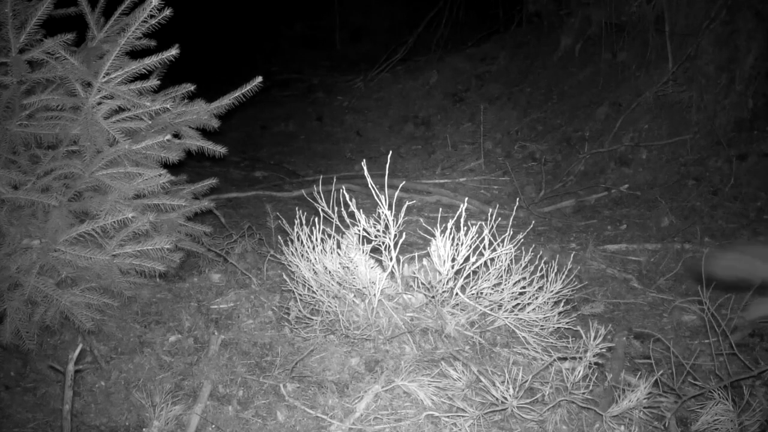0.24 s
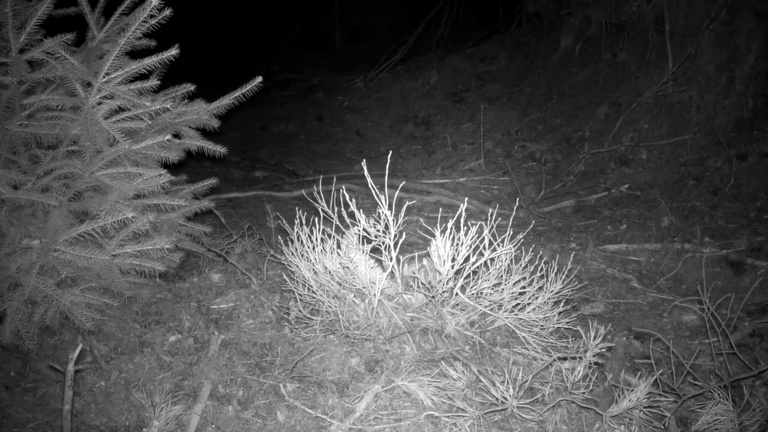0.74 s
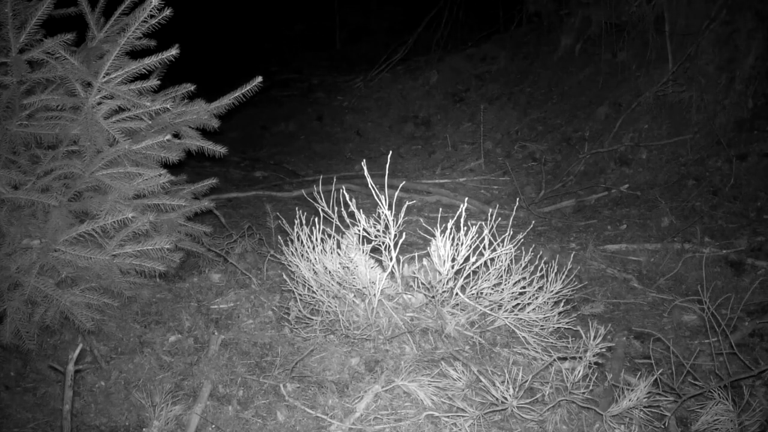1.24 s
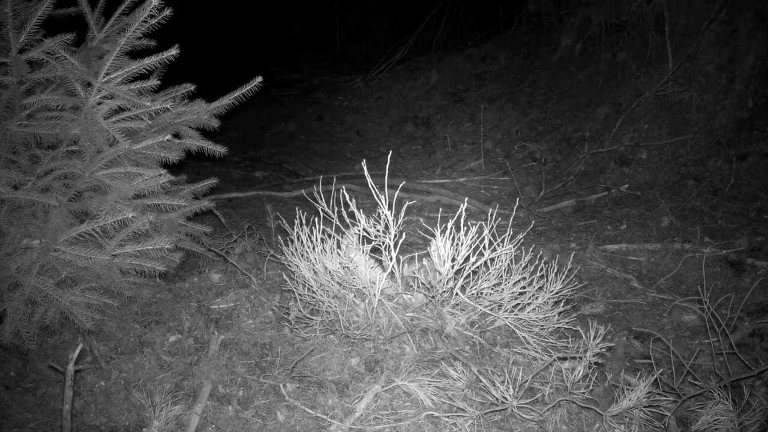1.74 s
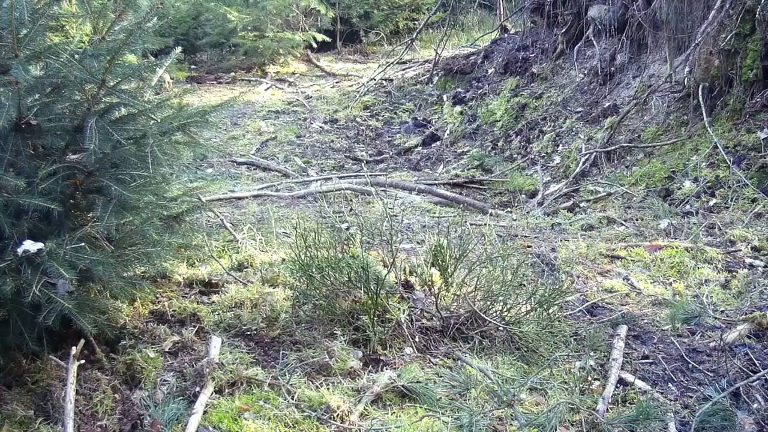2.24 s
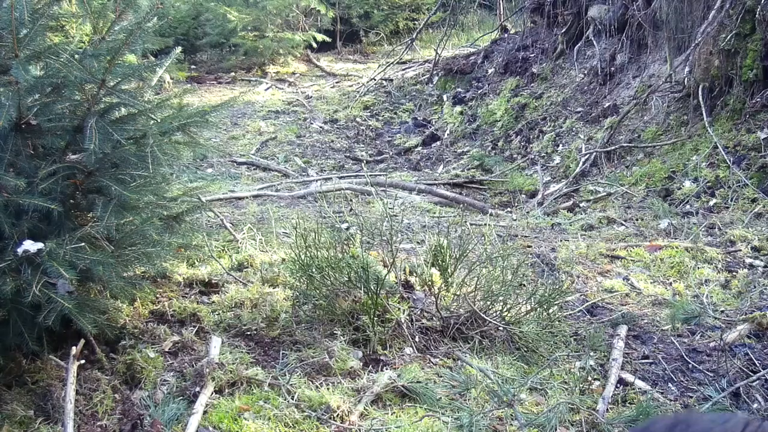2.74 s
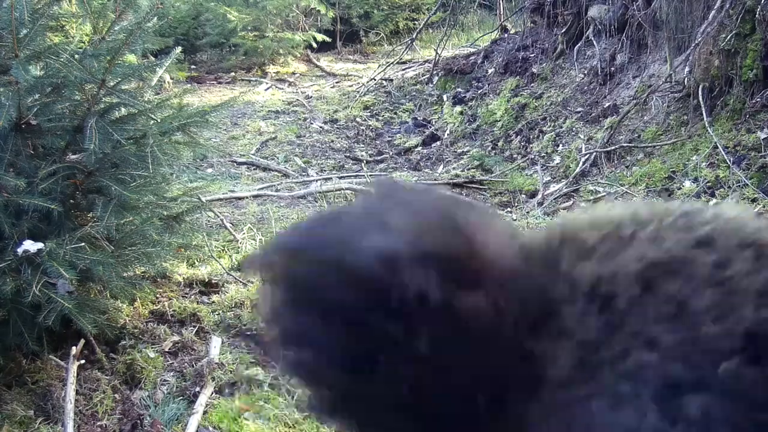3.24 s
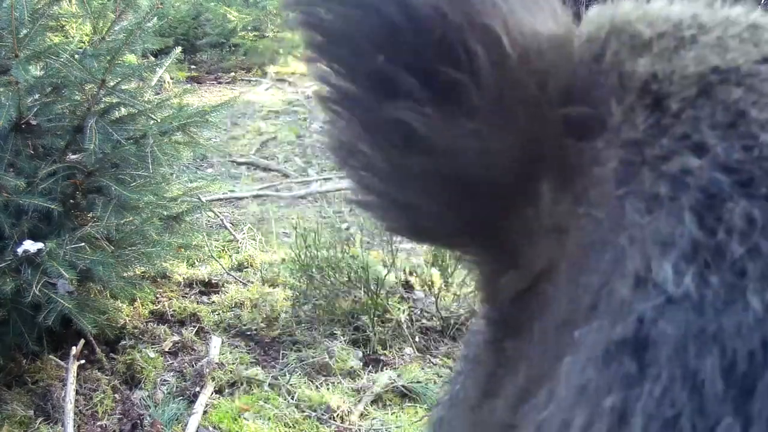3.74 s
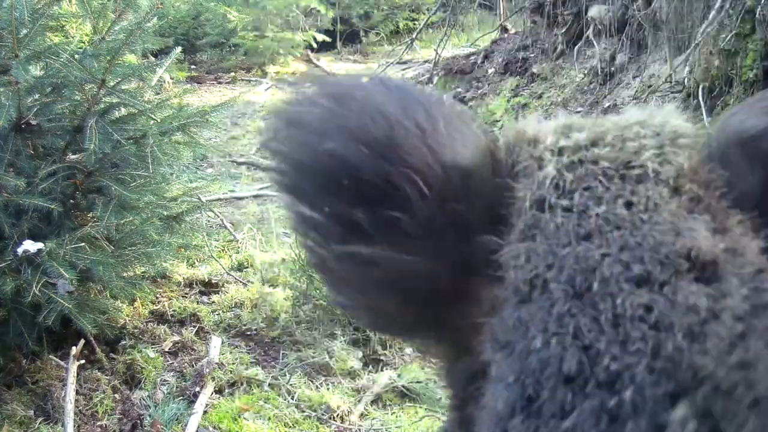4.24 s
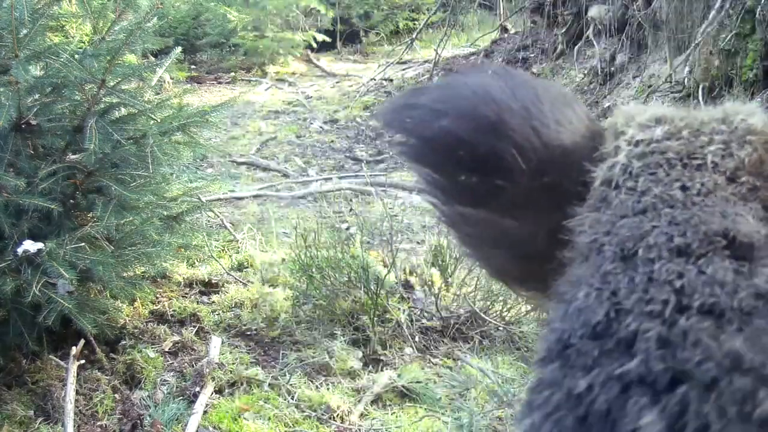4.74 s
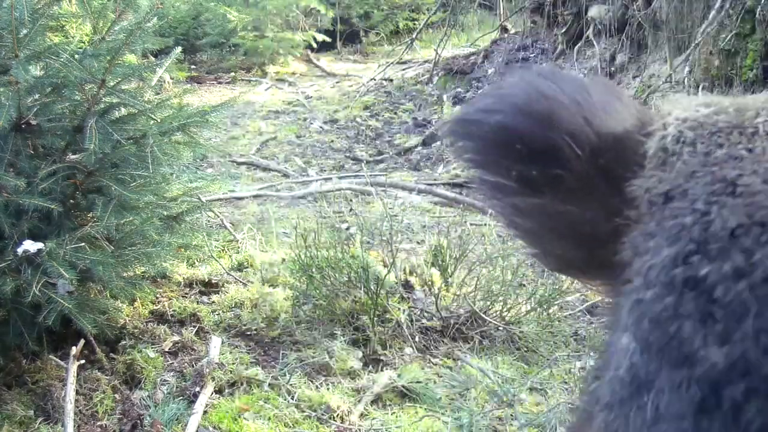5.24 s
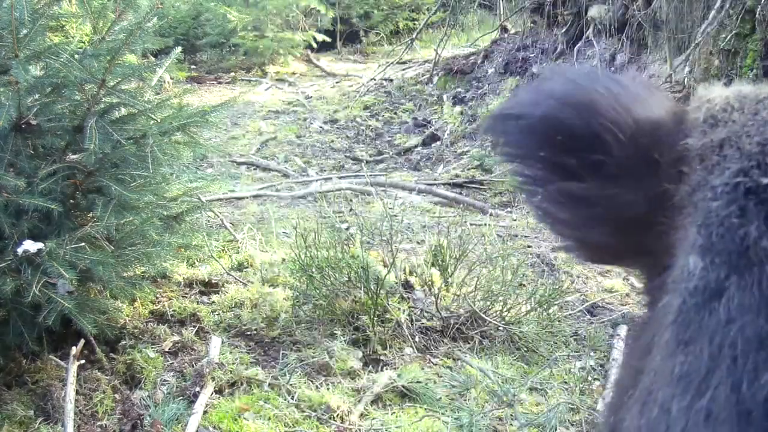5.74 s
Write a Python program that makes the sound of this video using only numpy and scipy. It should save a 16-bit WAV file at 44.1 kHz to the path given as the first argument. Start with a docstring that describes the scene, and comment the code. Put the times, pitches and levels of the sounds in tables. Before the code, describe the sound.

Shrill, quivering squeal at night fades to hushed air; abruptly, daytime rustling, one hard overloaded knock, and repeated coarse fur scraping against plastic.

```python
"""A thin, warbling animal squeal splits into two tones before a trail camera in a forest at night, then fades.
By day a wild boar rustles up, bumps the camera and rubs against it stroke after stroke.
The squeal is two oscillators in one throat, with overtones and breath noise. The rubbing is a dense rain
of bristle flicks, and the knocks are noise bursts with short modes of the plastic housing.
Chirps, a whistle, low hums, noisy clicks and puffs, snaps, crackling litter and forest air surround them."""
import sys
import numpy as np
from scipy import signal
from scipy.fft import rfft, irfft, next_fast_len
from scipy.io import wavfile
from scipy.ndimage import uniform_filter1d

SR = 44100
rng = np.random.default_rng(int(sys.argv[2]) if len(sys.argv) > 2 else 0)


def int16_out(signal):
    """Quantize to a 16-bit WAV file."""
    q = np.round(np.clip(np.atleast_2d(signal).T, -1, 1) * 32767)
    wavfile.write(sys.argv[1], SR, q.astype(np.int16))


N = 264159
T = np.arange(N) / SR  # time [s]

# The three cries of the squeal, one list each:
# (time [s], pitch [Hz], level of the first tone [dB], warble depth [share of the pitch])
CRIES = [
    [(0, 1192, -41, 0.011), (.014, 1180, -38.5, 0.014), (.026, 1150, -31.5, 0.051),
     (.055, 1098, -45.5, 0.025), (.105, 1120, -51, 0.057), (.2, 1324, -62, 0.009)],
    [(.243, 1390, -58, 0.012), (.26, 1480, -45, 0.024), (.315, 1450, -42.5, 0.028),
     (.352, 1431, -27, 0.048), (.38, 1412, -26.5, 0.035), (.405, 1324, -32.5, 0.063), (.45, 1317, -55, .02)],
    [(.48, 1320, -46.5, 0.012), (.512, 1361, -33, 0.062), (.53, 1440, -26.5, .06), (.585, 1434, -24, 0.053),
     (.63, 1283, -22, 0.083), (.69, 1173, -29, 0.11), (.745, 1209, -27.5, 0.14), (.766, 1233, -29.5, 0.14),
     (.783, 1166, -20.5, 0.044), (.804, 1147, -19, 0.026), (.832, 1031, -53, .02)],
]
# Spectrum of bristles scraping the housing, shape only: (frequency [Hz], relative density [dB per Hz])
SCRAPE_SPECTRUM = [(320, -37), (550, -20.5), (721, 7), (868, 5.5), (938, 2), (1010, 7), (1100, 1),
                   (1300, 5), (1410, 2), (1540, 3), (1910, 3.5), (3020, -4.5), (3500, 1.5), (4550, -33.5),
                   (7700, -120)]
# Spectrum of the bristles' hiss, shape only: (frequency [Hz], relative density [dB per Hz])
HISS_SPECTRUM = [(1710, -10.5), (2900, -25.5), (3510, 11), (3800, 6.5), (4230, 5.5), (6120, 5), (6490, 5),
                 (7510, 5.5), (8910, 1), (9780, 3), (12300, -2.5), (13600, -9), (14100, -45)]


def undb(db):
    """Decibels to gain."""
    return 10 ** (np.asarray(db) / 20)


def unit(x):
    """Scale to rms 1."""
    return x / np.sqrt(np.mean(x ** 2))


def curves(rows):
    """The columns of a table, joined by straight lines in time."""
    s, *columns = np.transpose(sorted(rows, key=lambda row: row[0]))
    return [np.interp(T, s, column) for column in columns]


def response(points, hz):
    """Gain of a (frequency [Hz], level [dB]) spectrum at these frequencies."""
    f, db = np.transpose(points)
    return undb(np.interp(np.log(hz + 1), np.log(f), db))


def colour(x, points):
    """Minimum-phase filter with the given spectrum, causal so that clicks keep their attack; rms 1."""
    size = next_fast_len(2 * N, real=True) // 2 * 2
    bins_hz = np.arange(size // 2 + 1) * SR / size
    cepstrum = irfft(np.log(response(points, bins_hz)))
    # fold the cepstrum onto positive time
    cepstrum[1:size // 2] *= 2
    cepstrum[size // 2 + 1:] = 0
    return unit(irfft(rfft(x, size) * np.exp(rfft(cepstrum)))[:N])


def band(x, lo_hz, hi_hz):
    """Gentle band-pass."""
    edges_hz = [lo_hz, min(hi_hz, SR / 2 - 1)]
    return signal.sosfilt(signal.butter(2, edges_hz, "band", fs=SR, output="sos"), x)


def walk(rate):
    """Smooth random motion of rms 1, from about this many random steps a second."""
    k = max(int(SR / rate), 1)
    steps = np.repeat(rng.standard_normal(N // k + 1), k)
    return unit(uniform_filter1d(uniform_filter1d(steps, k), k)[:N])


def add(out, s, sound):
    """Mix a short sound in at time s."""
    i = max(int(s * SR), 0)
    out[i:i + len(sound)] += sound[:N - i]


def tone(hz, jitter):
    """Complex oscillator whose pitch trembles by a random share."""
    return np.exp(2j * np.pi * np.cumsum(hz * (1 + jitter * walk(600))) / SR)


def swell(s, length):
    """A rounded rise and fall centred on time s."""
    return np.cos(np.pi * np.clip((T - s) / length, -.5, .5))


def gate(start, end, fade):
    """On between two times, with sloping edges."""
    return np.clip(np.minimum(T - start, end - T) / fade + .5, 0, 1)


def background(spectrum, db):
    """Still forest air and microphone hiss: steady coloured noise whose level drifts slightly."""
    return colour(rng.standard_normal(N), spectrum) * undb(db + .5 * walk(6))


def warble():
    """The quick swing of the pitch, -1 to 1; it slows as each cry goes on."""
    # (start of the cry [s], time of one pitch dip [s], dips a second at that time [Hz])
    warbles = [(0, 0.038, 16), (0.249, 0.367, 41), (.48, 0.518, 39.2)]
    slowing_hz_per_s = 35
    turns = np.zeros(N)
    for start, dip_s, rate in warbles:
        u = T - dip_s
        turns = np.where(T >= start, rate * u - slowing_hz_per_s * u ** 2 / 2, turns)
    return -np.cos(2 * np.pi * turns)


def squeal_motion():
    """Pitch and level of the first tone, pitch and share of the lower one: both warble together, at times lock."""
    # Where the voice splits and a lower tone joins:
    # (start [s], end [s], level against the first tone before the warble moves it [dB])
    splits = [(0.331, 0.398, 1.5), (.51, 0.587, 1.5), (0.599, 0.641, -6.5)]
    # The two tones lock into one note: (time [s], length [s], gain [dB], pitch drop [share])
    locks = [(0.392, 0.017, 0.5, 0.1), (0.596, 0.015, 12, 0.093), (0.625, .018, 8, 0.056),
             (.655, 0.013, 3.5, .01)]
    low_hz, low_warble, split_fade_s = 978, 0.048, 0.0076
    warble_db = 3  # louder as the pitch dips: dB per whole pitch of swing
    hz, db, depth = curves([row for cry in CRIES for row in cry])
    swing = warble()
    split = sum(undb(low_db) * gate(start, end, split_fade_s) for start, end, low_db in splits)
    # random share of the pitch: always some, more when split, more in a deep warble
    wobble = .003 + 0.011 * split + .13 * depth
    hz = hz * (1 + depth * swing + wobble * walk(260))
    db = db - warble_db * depth * swing + 1.3 * walk(260)
    low = split * undb(2.77 * swing)
    for s, length, gain_db, drop in locks:
        lock = swell(s, length)
        hz = hz * (1 - drop * np.sqrt(lock))
        db = db + gain_db * lock
        low = low * (1 - lock) ** 2
    low_pitch_hz = low_hz * (1 + low_warble * swing + wobble * walk(260))
    return hz, db, low_pitch_hz, low


def squeal():
    """Two oscillators in one throat; their joint motion makes the overtones, and so the tones between them."""
    # Strain of the voice: (time [s], octave [dB], high overtones [dB], shrill resonance [dB],
    # rasp before a 6 dB cut [dB])
    strain = [(0, 13, -10, -2, -28), (.03, -13, -16.5, 9, -19), (.07, -16, -21, 6, -18),
              (.27, -9, -6.5, 2, -9), (.32, -10, -8.5, 19, -7), (.36, -17, -13.5, 10.5, -27),
              (.42, -4, -10, 11, -9), (.5, -39, -27, -2, -19), (.56, -4.5, -24, -4.5, -23),
              (.6, -9.5, -37, 0, -27.5), (.68, -15, -25, -3, -20), (.74, -6, -19.5, -5, -11),
              (.8, -10.5, -42, 17, -25.5)]
    # Resonances of the throat: (frequency [Hz], gain [dB])
    throat = [(1700, 1), (2500, -7.5), (3000, -2.5), (3600, -3.5), (4300, -7), (6500, -3.5), (7400, -16.5),
              (9000, -5.5), (10800, -3.5), (12000, -7.5), (13500, -16.5)]
    shrill_hz, shrill_width_hz = 5880, 560  # the throat's sharpest resonance
    hz, db, low_hz, low = squeal_motion()
    octave_db, high_db, shrill_db, rasp_db = curves(strain)
    folds = tone(hz, jitter=0.0058) + low * tone(low_hz, jitter=0.0046)
    swing, phase = np.abs(folds), np.angle(folds)
    push = swing ** 3 / (1 + low) ** 2  # overtones come in bursts, when both tones push together
    centre_hz = (hz + low * low_hz) / (1 + low)
    voice = folds.real
    for k in range(2, 11):
        torn_db = 4 * walk(130) - 1
        tremble = .07 * walk(700)
        overtone_hz = k * centre_hz
        shrill = shrill_db / (1 + (2 * (overtone_hz - shrill_hz) / shrill_width_hz) ** 2)
        strength = undb(torn_db + shrill + (high_db if k > 2 else octave_db))
        overtone = push * np.cos(k * phase + k * tremble)
        voice = voice + strength * response(throat, overtone_hz) * overtone
    # air hisses through the same throat, once a cycle
    air = band(rng.standard_normal(N) * (1 + np.cos(phase)), 1400, 13000)
    rasp = colour(air, throat) * np.sqrt(1 + low ** 2) * undb(rasp_db - 6)
    sounding = T < CRIES[-1][-1][0]
    return np.sqrt(2) * (voice + rasp) * undb(db) * sounding


def electronic_whine():
    """The camera's electronics at the microphone by night: steady pure tones."""
    # (frequency [Hz], level [dB])
    whine = [(4683, -71.5), (6245, -72), (9367, -75.5)]
    return sum(np.sqrt(2) * undb(db) * np.sin(2 * np.pi * hz * T) for hz, db in whine)


def night_air():
    """Night air and microphone hiss: coloured noise that swells and sinks."""
    # Noise spectrum, shape only: (frequency [Hz], relative density [dB per Hz])
    night_spectrum = [(25, 0.5), (100, -1.5), (200, -3.5), (450, -6), (900, -8.5), (1400, -13.5),
                      (2500, -16), (6400, -16), (13000, -18.5), (14100, -27)]
    # Swell above the base level: (time [s], gain [dB])
    night_swell = [(0, 6), (.25, 2.5), (.55, 11), (.85, 6), (1.05, 2), (1.7, 1)]
    return background(night_spectrum, -55.5 + curves(night_swell)[0])


def clicks_and_puffs():
    """Noisy clicks and puffs around the squeal, two low scuffs as the day cuts in: swells of band-passed noise."""
    # (time [s], length [s], nominal centre [Hz], level [dB])
    puffs = [(0.444, 0.015, 8520, -46), (0.506, 0.09, 7600, -45), (0.694, 0.0086, 7060, -37),
             (.7, 0.015, 11100, -32.5), (0.698, 0.013, 4200, -35.5), (0.718, 0.00223, 7200, -23),
             (0.815, 0.004, 9740, -35), (0.975, 0.0031, 7200, -37.5), (2.005, 0.081, 514, -42),
             (2.014, 0.1, 880, -44)]
    noise = rng.standard_normal(N)
    out = np.zeros(N)
    for s, length, hz, db in puffs:
        out += undb(db) * swell(s, length) * unit(band(noise, 0.9 * hz, 1.14 * hz))
    return out


def far_whistle():
    """A faint, far, quivering note with its octave, sliding down from a louder, higher start."""
    start_s, end_s, note_hz, note_db, octave_db = 1, 1.71, 1040, -60, -5
    slide, slide_s, accent_db = 0.13, 0.0314, 11  # slide as a share of the pitch
    onset = np.exp(-np.maximum(T - start_s, 0) / slide_s)
    z = tone(note_hz * (1 + slide * onset + 0.015 * walk(110)), jitter=0.0123)
    level = gate(start_s, end_s, 0.019) * undb(note_db + accent_db * onset + 3.2 * walk(120))
    octave = undb(octave_db) * (1 - onset) * (z * z).real  # squaring doubles the pitch
    return level * (z.real + octave)


def notes(rows, jitter):
    """Short gliding tones that swell and die."""
    out = np.zeros(N)
    for s, length, hz, db, rise in rows:
        glide = 2 ** (rise * np.clip(T - s, -length, length))
        out += np.sqrt(2) * undb(db) * swell(s, length) * tone(hz * glide, jitter).real
    return out


def far_chirps():
    """Far chirps: short, trembling, gliding tones."""
    # (time [s], length [s], pitch [Hz], level [dB], rise [octaves per s])
    chirps = [(1.035, 0.051, 3000, -53, 5), (1.085, .06, 2930, -60, -1), (1.21, 0.17, 5000, -64, -1),
              (1.69, 0.039, 3060, -60, 0), (1.73, .06, 3080, -58.5, -0.5)]
    return notes(chirps, jitter=0.027)


def stroking():
    """Level, hiss and push in dB: each stroke swells and lets go, over a light contact."""
    # Strokes of the coat over the housing: (time [s], level [dB], rise over 20 dB [s], fall over 20 dB [s],
    # bristle hiss against the level [dB], push on the housing against the level [dB])
    strokes = [ (1.986, -45, 0.053, 0.19, 0, -0.5), (2.12, -47, 0.18, 0.15, 1, -5.5),
               (2.348, -47, 0.0777, 0.046, 3, -6.5), (2.429, -49, 0.14, 0.19, -1, -3),
               (2.936, -43.5, .07, 0.12, 0.5, -6.5), (2.991, -33, 0.033, 0.022, -15, -2.5),
               (3.038, -32, 0.082, 0.11, -1, -6), (3.101, -35.5, 0.11, 0.071, 0.5, -10),
               (3.276, -47, 0.13, 0.24, 2.5, -9), (3.344, -40.5, 0.028, 0.074, -6, 0),
               (3.473, -31.5, 0.11, .08, 1, -6), (3.517, -32.5, .05, 0.04, -2.5, -11),
               (3.698, -36.5, 0.15, .05, 0.5, -9), (3.887, -29, 0.072, 0.11, 1, -7.5),
               (3.932, -27.5, 0.062, 0.17, 0.5, -11.5), (4.126, -41, 0.038, 0.057, -1.5, -8),
               (4.211, -35, 0.057, 0.13, -1.5, -11), (4.285, -26, 0.12, 0.079, -1.5, -12.5),
               (4.51, -38, 0.16, 0.088, 1, -10), (4.698, -30, 0.081, .06, -2, -10.5),
               (4.925, -34.5, 0.19, 0.078, -1, -11), (5.118, -34, 0.075, 0.047, -1.5, -7.5),
               (5.284, -40.5, 0.14, .15, -2.5, -16.5), (5.494, -40.5, 0.016, 0.061, -1.5, -2),
               (5.527, -35, 0.051, 0.041, -5, -9), (5.72, -43.5, 0.22, 0.24, -5, -5.5),
               (5.851, -29.5, 0.15, 0.17, -3.5, -14.5), (5.93, -32.5, 0.13, 0.13, -3, -10)]
    # Light contact of the coat between strokes: (time [s], level [dB])
    light_contact = [(2.25, -69), (2.55, -54), (2.7, -59), (2.85, -56.5), (3.3, -55.5), (3.8, -50),
                     (4.1, -48), (4.6, -55), (5.2, -52), (5.43, -61), (5.99, -46.5)]
    contact_hiss_db, contact_push_db = 2.5, -4
    roundness = 1.282  # 1 = pointed, 2 = bell
    contact = undb(curves(light_contact)[0]) ** 2
    power = np.outer(undb([0, contact_hiss_db, contact_push_db]) ** 2, contact)
    for s, db, rise, fall, hiss_db, push_db in strokes:
        near = slice(*np.searchsorted(T, [s - 3 * rise, s + 3 * fall]))
        away = np.maximum((s - T[near]) / rise, (T[near] - s) / fall)
        peaks = undb([db, db + hiss_db, db + push_db])
        power[:, near] += np.outer(peaks, undb(-20 * away ** roundness)) ** 2
    level, hiss, push = 10 * np.log10(power)
    return level, hiss - level, push - level


def bristles(rate, spread_db):
    """Random tiny flicks of very unequal size, about this many a second; rms 1."""
    size = undb(spread_db * np.minimum(rng.exponential(size=N), 5))
    return unit((rng.random(N) < rate / SR) * size * rng.standard_normal(N))


def rubbing():
    """The coat slides over the housing: the harder the stroke, the more bristles flick each second."""
    # Spectrum of the pushed housing, shape only: (frequency [Hz], relative density [dB per Hz])
    push_spectrum = [(76, -17.5), (130, -15.5), (172, -4.5), (220, -13.5), (334, -1), (446, 0), (543, 0),
                     (700, 5.5), (910, -10), (1540, -120)]
    db, hiss_db, push_db = stroking()
    rate = 10000 * undb(0.6 * (db + 39))
    flicks = bristles(rate, spread_db=2.0)
    fine = bristles(2 * rate, spread_db=3.0)  # thin hairs only hiss
    scrape = colour(flicks, SCRAPE_SPECTRUM) * undb(0.6 * walk(90))
    hiss = colour(flicks + 0.59 * fine, HISS_SPECTRUM) * undb(hiss_db + 1.2 * walk(100))
    push = colour(flicks, push_spectrum) * undb(push_db + 0.79 * walk(60))
    return (scrape + hiss + push) * undb(db)


def litter():
    """Dry leaves and needles crackle at random under the boar: sparse clicks become decaying noise bursts."""
    clicks = bristles(110, spread_db=2.5)
    burst = rng.standard_normal(400) * np.exp(-T[:400] / .0012)
    crackle = signal.fftconvolve(clicks, burst)[:N]
    return (colour(crackle, SCRAPE_SPECTRUM) + undb(-3) * colour(crackle, HISS_SPECTRUM)) * undb(-61)


def day_air():
    """Forest air and microphone hiss by day: coloured noise at a nearly even level."""
    # Noise spectrum, shape only: (frequency [Hz], relative density [dB per Hz])
    day_spectrum = [(15, -14), (25, 2.5), (110, 0.5), (225, -4), (437, -7.5), (526, -9), (763, -10),
                    (968, -10), (1050, -31), (1300, -19.5), (1880, -18.5), (2090, -26.5), (6700, -15),
                    (14100, -22)]
    return background(day_spectrum, -54)


def snaps():
    """Single stiff bristles and twigs let go with a crack of a millisecond or so."""
    # (time [s], peak level [dB], share of treble, limited to 0.98 as a gain [dB])
    cracks = [(2.399, -33, -3), (2.43, -28.5, -3.5), (2.435, -34, -6), (2.4617, -35.5, 0),
              (2.5255, -35.5, 2), (2.534, -39, -17), (2.707, -37.5, -12), (2.817, -38, -17),
              (3.103, -26.5, -7), (3.145, -25.5, -1.5), (3.5791, -27.5, 0), (3.673, -25, 14),
              (3.717, -16, -1.5), (3.806, -18.5, -4), (3.826, -19, 2.5), (3.8395, -24, -12),
              (3.8452, -13, -1), (3.9313, -8, -11), (4.0331, -14.5, -1), (4.044, -28, 1.5),
              (4.2858, -14, -12), (4.695, -14, 17), (4.716, -11, -4.5), (5.0825, -25, -2.5),
              (5.3032, -19.5, -10), (5.485, -28, -7), (5.7812, -19, 16), (5.8684, -10, -3)]
    out, t = np.zeros(N), T[:1500]
    for s, db, treble_db in cracks:
        crack = rng.standard_normal(len(t)) * (np.exp(-t / .0012) + .08 * np.exp(-t / .005))
        share = np.clip(undb(treble_db), 0, .98)
        middle = unit(band(crack, 610, 3300))
        treble = unit(band(crack, 4800, 8400))
        hit = np.sqrt(1 - share ** 2) * middle + share * treble
        add(out, s, undb(db) * hit / np.abs(hit).max())
    return out


def grunts():
    """Soft low hums, perhaps grunts: short, trembling tones."""
    # (time [s], length [s], pitch [Hz], level [dB], rise [octaves per s])
    hums = [(2.722, 0.071, 182.4, -46, 0.0038), (3.46, 0.043, 167.7, -41.5, 0.002),
            (5.525, 0.026, 176.8, -41.5, 0)]
    return notes(hums, jitter=0.07)


def knocks():
    """The head bumps the housing: a snap, a broad crack and short plastic modes; soft blows ring only low ones."""
    # (time [s], peak level before overload [dB], snap against the body [dB],
    # damping of the high modes [dB per octave], which as plain dB also lowers the crack)
    blows = [(2.9385, -19.5, -1, 12), (2.978, -8.5, 2.5, 17), (2.9928, -22, -10, -3),
             (2.993, -19.5, -10, 11), (3.0153, 7, -3, -1.5), (3.0538, -9, 0, 1), (3.337, -27, -15, 2),
             (3.455, -16.5, -6, 20.5), (3.8513, -2, 16.5, -12)]
    # Modes of the housing: (nominal frequency [Hz], relative level before damping [dB], decay by 60 dB [s])
    modes = [(432, -36.5, 0.052), (900, -10, 0.0056), (1230, -9.5, 0.007), (1940, -4.5, 0.0043),
             (2310, -7.5, 0.01), (2700, -10.5, 0.014), (3520, -6.5, .007)]
    out, t = np.zeros(N), T[:4000]
    for s, db, snap_db, soft_db in blows:
        body = 0
        for hz, mode_db, t60 in modes:
            struck_hz = hz * (1 + 0.03 * rng.standard_normal())
            ring = np.cos(2 * np.pi * struck_hz * t + rng.uniform(0, 2 * np.pi))
            ring = ring * np.exp(-np.log(1000) * t / t60)
            body = body + undb(mode_db - soft_db * np.log2(hz)) * ring
        body = band(body, 260, 3100)
        crack = band(rng.standard_normal(len(t)) * np.exp(-t / .0012), 900, 2900)
        snap = band(rng.standard_normal(len(t)) * np.exp(-t / 0.00054), 5270, 7700)
        hit = body / np.abs(body).max()
        hit = hit + undb(-1 - soft_db) * crack / np.abs(crack).max()
        hit = hit + undb(snap_db) * snap / np.abs(snap).max()
        add(out, s, undb(db) * hit / np.abs(hit).max())
    return out


def scene():
    """The night fades out; the day cuts in."""
    fade_s, cut_s = 1.7, 1.969
    night = squeal() + electronic_whine() + night_air() + far_whistle() + far_chirps()
    day = rubbing() + litter() + day_air() + grunts()
    fade_out = np.clip((cut_s - T) / (cut_s - fade_s), 0, 1)
    cut_in = np.clip((T - cut_s) / 0.0043, 0, 1)
    mix = night * fade_out + day * cut_in + clicks_and_puffs() + snaps() + knocks()
    return mix[None]  # one channel


def record(dry):
    """The camera's microphone: the hardest knock overloads and clips, then a steep low-pass cuts the top."""
    top_hz = 14300
    low_pass = signal.ellip(8, .2, 70, top_hz, fs=SR, output="sos")
    return signal.sosfilt(low_pass, np.clip(dry, -1, 1))


dry = scene()
out = record(dry)
int16_out(out)
```